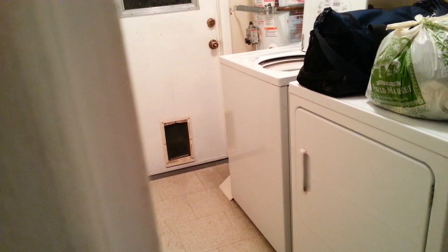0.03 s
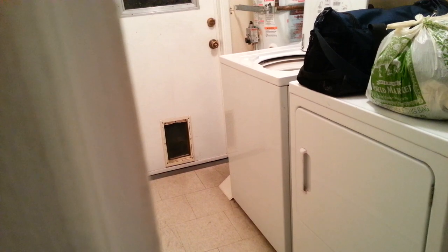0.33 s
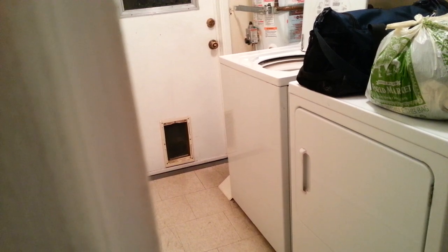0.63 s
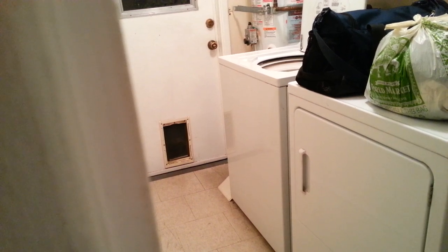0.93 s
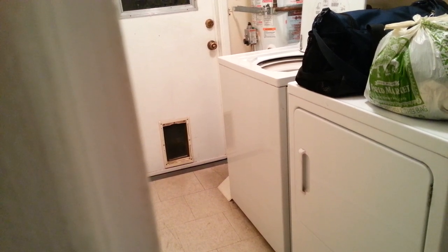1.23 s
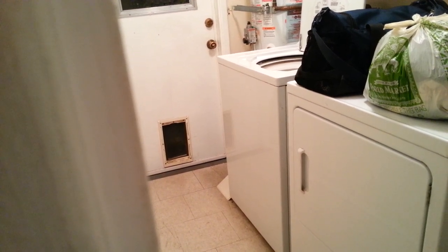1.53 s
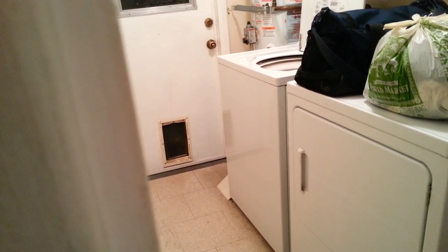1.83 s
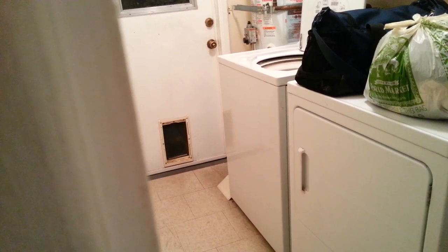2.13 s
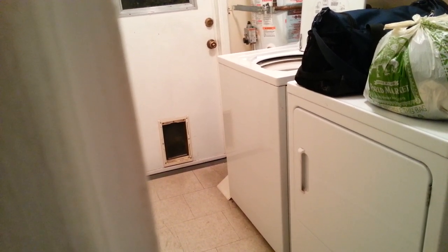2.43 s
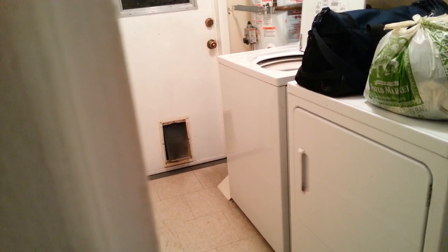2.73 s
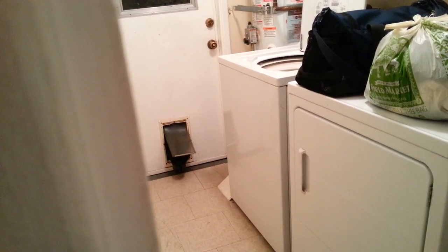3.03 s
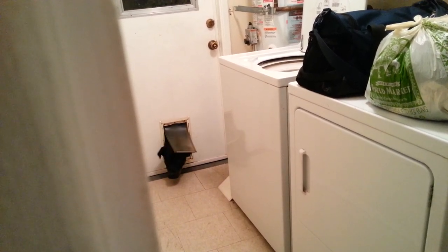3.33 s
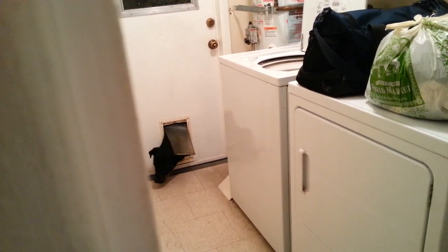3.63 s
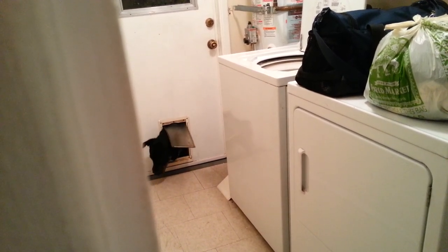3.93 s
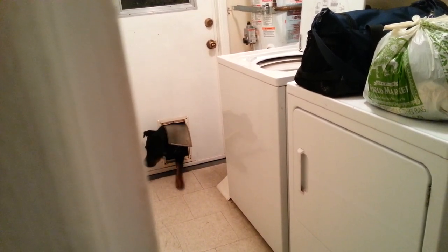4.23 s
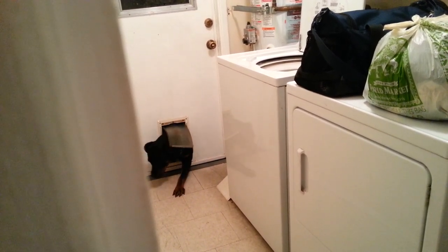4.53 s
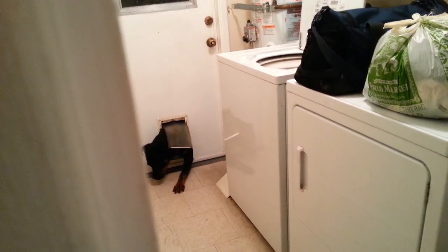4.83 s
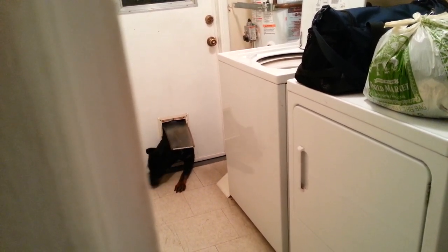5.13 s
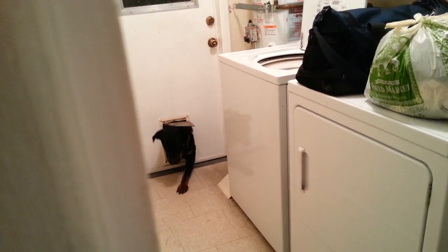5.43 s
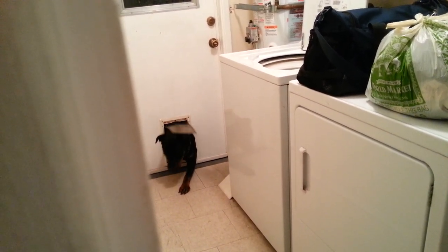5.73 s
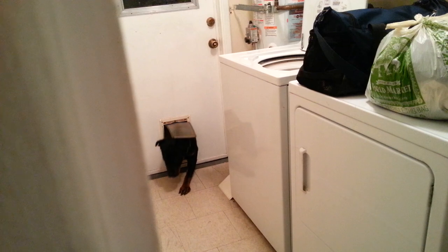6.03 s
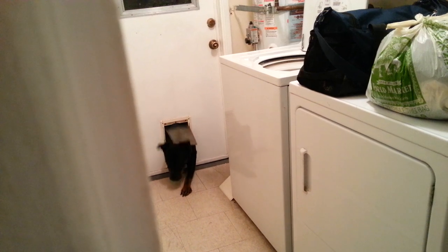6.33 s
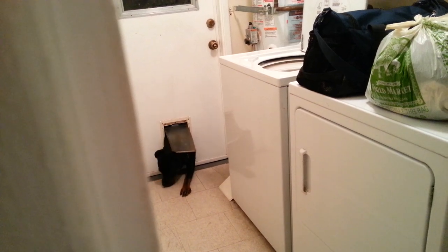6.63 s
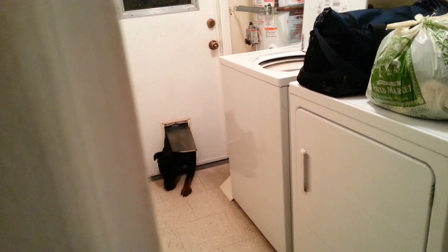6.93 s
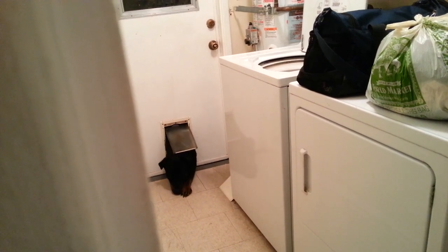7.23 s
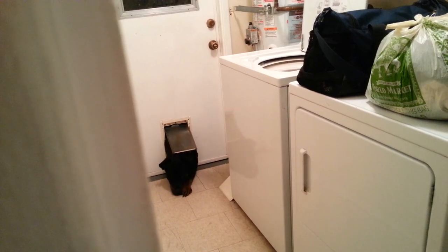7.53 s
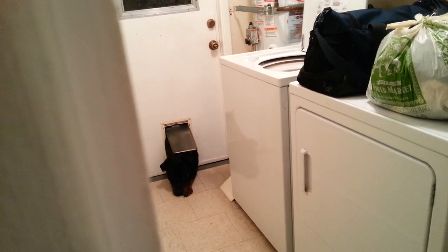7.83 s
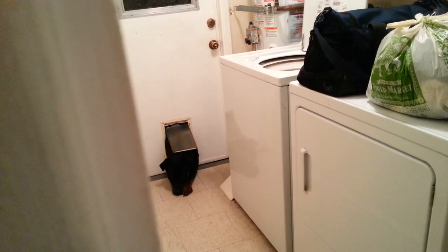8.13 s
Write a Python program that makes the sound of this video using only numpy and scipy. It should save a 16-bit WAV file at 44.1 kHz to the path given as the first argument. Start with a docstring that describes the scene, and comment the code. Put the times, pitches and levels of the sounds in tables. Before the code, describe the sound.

A plastic pet door flap clacks, scrapes and thumps as a dog squeezes through, collar tags jingling faintly in a quiet, humming room.

```python
"""A plastic pet-door flap clacks and scrapes as a dog squeezes through, a few metres away in a laundry room.
Impacts excite the modes of flap and frame; friction makes the fur hiss and the flap edge squeak.
The dog's shoulders bend the door panel into thumps and set the loose frame rattling, and its metal
collar tags collide and jingle. The hard walls reverberate, over a low steady hum."""
import sys
import numpy as np
from scipy import signal
from scipy.fft import rfft, irfft, next_fast_len
from scipy.io import wavfile

SR = 44100
rng = np.random.default_rng(int(sys.argv[2]) if len(sys.argv) > 2 else 0)


def store_pcm(level_fs):
    """Save levels as 16-bit WAV."""
    pcm = np.round(np.clip(level_fs, -1, 1) * 32767).astype(np.int16)
    wavfile.write(sys.argv[1], SR, np.atleast_2d(pcm).T)


N = 369116
EVENT_SIZE = 16384
EVENT_S = np.arange(EVENT_SIZE) / SR  # time axis of a single event

# shoves against the door: start_s, thump_db, swing_hz, rattle_db
SHOVES = [(3.318, -26, 320, -29), (3.885, -33, 230, -49), (4.286, -28, 222, -25.5), (4.313, -26, 202, -49),
          (4.743, -12.5, 299, -17), (4.882, -23.5, 242, -19.5), (5.355, -22, 223, -22),
          (5.439, -29, 300, -60), (5.550, -39, 232, -32), (5.697, -28, 222, -25.5),
          (6.062, -21, 242, -22.5), (6.235, -35, 227, -34), (6.564, -27.5, 237, -27.5)]


def undb(db):
    """Amplitude ratio of a level in decibels."""
    return 10 ** (np.asarray(db) / 20)


def unit(x):
    """Normalisation to unit energy."""
    return x / np.sqrt(np.sum(x ** 2) + 1e-18)


def read_curve(points, hz):
    """Interpolation of (frequency_hz, value) points on a logarithmic frequency axis."""
    point_hz, value = np.transpose(points)
    return np.interp(np.log(hz + 1), np.log(point_hz), value)


def colour(points, tilt_db=0, bump_hz=1000, bump_db=0, size=2048):
    """Minimum-phase response from (frequency_hz, level_db) points, a tilt per octave and a resonance."""
    hz = np.fft.rfftfreq(size, 1 / SR)
    db = read_curve(points, hz) + tilt_db * np.log2(np.maximum(hz, 400) / 1500)
    db += bump_db * np.exp(-(2 * np.log2((hz + 1) / bump_hz)) ** 2)
    cepstrum = irfft(np.log(undb(db)))
    cepstrum[1:size // 2] *= 2  # folding the cepstrum makes the response causal
    cepstrum[size // 2 + 1:] = 0
    return irfft(np.exp(rfft(cepstrum)))


def through(x, response):
    """Convolution with an impulse response, cut to the length of the input."""
    return signal.oaconvolve(x, response)[:len(x)]


def add(track, start_s, sound):
    """Superposition of a sound on a track."""
    i = int(np.clip(start_s * SR, 0, N - 1))
    track[i:i + len(sound)] += sound[:N - i]


def ring(hz, t60_s):
    """Free vibration of one damped mode."""
    return np.sin(2 * np.pi * hz * EVENT_S) * np.exp(-np.log(1000) * EVENT_S / t60_s)


def arch(length_s):
    """Half-sine pulse, followed by silence."""
    return np.sin(np.pi * np.minimum(EVENT_S / length_s, 1))


def clicks(size, per_s, spread_db):
    """Poisson process of tiny contacts of uneven strength, at unit rms."""
    hits = rng.random(size) < per_s / SR
    strength = undb(spread_db * np.clip(rng.standard_normal(size), -2, 2))
    return unit(hits * rng.choice([-1, 1], size) * strength) * np.sqrt(size)


def flap_clacks(chatter_s=0.003, chatter_db=7, resonance_db=5, gain_db=24):
    """Impact excitation: each hard contact chatters and favours the resonance of the spot it strikes."""
    # flap clacks and claw taps: start_s, level_db, tilt_db_per_octave, resonance_hz
    impacts = [(2.984, -44.5, -13.5, 1300), (3.088, -27, -10, 990), (3.152, -16.5, 1, 1800),
               (3.163, -6.5, 0.1, 3050), (3.167, -16, -2, 1800), (3.172, -10, -1.5, 1130),
               (3.363, -20.5, 0.5, 1210), (3.397, -19.5, 1.5, 3400), (3.705, -21, 3, 2600),
               (3.825, -25.5, 5, 2800), (4.102, -19, -4, 1360), (4.14, -19, 6, 3780),
               (4.17, -19.5, 3.5, 2650), (4.282, -21.5, 5.5, 2560), (4.531, -24.5, 4, 4330),
               (4.593, -24.5, 7.5, 2450), (5.007, -32.5, 12.5, 3420), (5.446, -30, 7, 1200),
               (5.563, -31.5, -0.5, 1140), (5.868, -30, 3, 2700), (5.887, -25, 4.5, 2750),
               (6.561, -33, -8.5, 800), (6.582, -38, -3.5, 3200), (7.294, -27.5, 5, 3000)]
    # spectrum of a hard contact: frequency_hz, level_db
    crack = [(60, -34), (200, -6), (500, -4.5), (700, -1.5), (950, 1), (1600, 3), (2200, 0.5), (3200, -2),
             (5000, -8), (7000, -14.5), (10000, -22), (14500, -45)]
    out = np.zeros(N)
    decay = np.exp(-EVENT_S[:4096] / chatter_s)
    for start_s, level_db, tilt_db, resonance_hz in impacts:
        contact = undb(chatter_db) * unit(clicks(len(decay), per_s=3700, spread_db=1.5) * decay)
        contact[0] += 1  # the first strike
        spot = colour(crack, tilt_db, resonance_hz, resonance_db)
        add(out, start_s, undb(level_db + gain_db) * unit(through(contact, spot)))
    return out


def plastic_body(force, direct_db, ring_db):
    """Modal resonance: flap and frame radiate each contact into the room and ring on after it."""
    # modes of the flap and frame: pitch_hz, bandwidth_hz, level_db
    modes = [(754, 19, -3), (947, 23, 0), (1130, 55, 0), (1450, 28, -5), (1790, 28, -3), (2280, 27, -10),
             (2600, 38, -8), (3090, 33, -7), (3420, 22, -8)]
    ringing = np.zeros((2, N))
    for channel in range(2):
        response = 0
        for pitch_hz, bandwidth_hz, level_db in modes:
            t60_s = np.log(1000) / (np.pi * bandwidth_hz)
            response += rng.choice([-1, 1]) * undb(level_db) * ring(pitch_hz, t60_s)
        ringing[channel] = through(force, unit(response))
    return room(force, direct_db) + undb(ring_db) * ringing


def flap_squeaks(t60_s=0.0071, gain_db=23):
    """Stick-slip friction: the catching edge drives one resonance of the flap."""
    # catches of the flap edge: start_s, length_s, pitch_hz, level_db
    catches = [(3.084, 0.034, 850, -28), (3.319, 0.029, 268, -25.5), (3.324, 0.043, 475, -27),
               (3.382, 0.072, 830, -31.5), (3.538, 0.097, 840, -37), (4.179, 0.029, 1010, -18.5),
               (4.237, 0.052, 1070, -22), (5.423, 0.022, 690, -29)]
    out = np.zeros(N)
    for start_s, length_s, pitch_hz, level_db in catches:
        slips = clicks(EVENT_SIZE, per_s=810, spread_db=5.5) * arch(length_s)
        mode = np.diff(ring(pitch_hz, t60_s)[:2048])  # differencing makes the resonance a band-pass, so the squeak carries little bass
        squeak = through(through(slips, mode), mode)
        add(out, start_s, undb(level_db + gain_db) * unit(squeak))
    return out


def door_thumps(swing_db=3, swing_t60_s=0.028, push_cycles=0.71, echo_s=0.028, echo_db=-10, gain_db=23):
    """Plate bending: a soft push excites one heavily damped swing and the modes of the door panel."""
    # modes of the door panel: pitch_hz, t60_s, level_db
    modes = [(60, 0.24, -8.5), (80, 0.22, -29), (154, 0.17, -20), (185, 0.16, 0), (227, 0.12, 2.5),
             (288, 0.11, -0.5), (355.2, 0.17, 0), (465, 0.089, -7.5), (610, 0.068, 2)]
    ringing = unit(sum(undb(db) * ring(hz, t60_s) for hz, t60_s, db in modes))
    out = np.zeros(N)
    for start_s, thump_db, swing_hz, _ in SHOVES:
        panel = ringing + undb(swing_db) * unit(ring(swing_hz, swing_t60_s))
        push = arch(push_cycles / swing_hz)[:512] ** 2
        radiated = through(panel, np.diff(push))  # only a changing force radiates
        thump = undb(thump_db + gain_db) * unit(radiated)
        add(out, start_s, thump)
        add(out, start_s + echo_s, undb(echo_db) * thump)  # reflection from the far wall
    return out


def frame_rattles(lag_s=0.012, peak_s=0.009, gain_db=24):
    """Contact chatter: just after each shove the loose frame catches up and buzzes briefly."""
    # spectrum of the buzzing frame: frequency_hz, level_db
    spectrum = [(60, -26), (200, -7), (500, -3), (1100, -1.5), (1900, -7), (3500, -6.5), (5000, -11.5),
                (7000, -21.5), (10000, -32), (14500, -54)]
    out, buzz = np.zeros(N), colour(spectrum)
    swell = (EVENT_S / peak_s) ** 2 * np.exp(-2 * EVENT_S / peak_s)
    for start_s, _, _, rattle_db in SHOVES:
        contacts = swell * clicks(EVENT_SIZE, per_s=1500, spread_db=1)
        add(out, start_s + lag_s, undb(rattle_db + gain_db) * unit(through(contacts, buzz)))
    return out


def fur_rubbing(tick_db=-1, hiss_db=-5, surge_peak_s=0.038, surge_db=-17, gain_db=-4):
    """Sliding friction: fur hisses on the frame and the flap edge ticks over it, surging at each shove."""
    # steady rubbing, set by how tightly the dog fills the frame: time_s, level_db
    squeeze = [(2.65, -66), (3.3, -45), (3.95, -49.5), (4.4, -40), (5.15, -49), (5.8, -42.5), (6.55, -47),
               (6.85, -60)]
    # spectrum of sliding fur: frequency_hz, level_db
    spectrum = [(100, -13), (250, 2.5), (500, -2), (1000, -5), (1900, -10), (3300, -9.5), (6000, -19),
                (9000, -21.5), (14500, -31)]
    pressure = undb(np.interp(np.arange(N) / SR, *np.transpose(squeeze), left=-120, right=-120))
    surge = (EVENT_S / surge_peak_s * np.exp(1 - EVENT_S / surge_peak_s)) ** 2
    for start_s, _, _, rattle_db in SHOVES:
        add(pressure, start_s, undb(rattle_db + surge_db) * surge)
    ticks = undb(tick_db) * clicks(N, per_s=490, spread_db=1)
    hiss = undb(hiss_db) * rng.standard_normal(N)
    return undb(gain_db) * through((ticks + hiss) * pressure, unit(colour(spectrum)))


def scuffs(gain_db=23):
    """Friction noise: paws, coat and flap brush the door in soft, muffled strokes."""
    # brushes against the door: start_s, length_s, level_db, tilt_db_per_octave
    strokes = [(1.194, 0.073, -40, -0.5), (2.7, 0.061, -41, -0.5), (2.734, 0.24, -39.5, 10.5),
               (3.017, 0.2, -30.5, 5.5), (3.198, 0.21, -25.5, 2), (3.67, 0.31, -30.5, 3),
               (4.099, 0.28, -19.5, 3), (4.359, 0.12, -35.5, 6.5), (4.547, 0.094, -29, 0.5),
               (5.229, 0.15, -34.5, 4), (5.393, 0.095, -28.5, 1), (5.862, 0.095, -24.5, 1.5),
               (6.352, 0.056, -30.5, 3), (7.293, 0.033, -31.5, 2), (7.437, 0.29, -35.5, 3),
               (7.681, 0.39, -40.5, 2)]
    # spectrum of a soft contact: frequency_hz, level_db
    muffled = [(60, -35), (150, -15), (350, 1.5), (700, 0), (1200, -4), (2200, -9), (8000, -24),
               (14500, -42)]
    out = np.zeros(N)
    for start_s, length_s, level_db, tilt_db in strokes:
        slide = rng.standard_normal(EVENT_SIZE) * arch(length_s)
        add(out, start_s, undb(level_db + gain_db) * unit(through(slide, colour(muffled, tilt_db))))
    return out


def collar_tags(touches=4, bounce_s=0.014, bounce_db=-6, tick_db=-17, upper_hz=12000, gain_db=21):
    """Free vibration of plates: two metal tags rebound, and each touch weights their modes anew."""
    # collisions: start_s, level_db, first_over_second_db, upper_modes_db
    collisions = [(3.191, -29, 3, -4), (3.398, -30, -2, 11), (3.824, -35.5, 4, 6), (3.855, -25.5, 13, -8),
                  (4.185, -23, 14, 13), (5.599, -50, -19, -8), (5.826, -38.5, -4, -4),
                  (5.997, -33.5, -1, -7), (6.128, -37.5, -7, -3), (6.242, -32, 1, -7),
                  (6.584, -26, -7.5, -4)]
    # modes of the tags: pitch_hz, owner (+1 first tag, -1 second)
    tag_modes = [(9286, -1), (9787, 1), (10588, -1), (10975, 1), (12790, -1), (12825, 1)]
    # ring of each of those modes: t60_s, level_db
    decays = [(.15, -20), (.15, -17), (.28, -6.5), (.48, -3), (.15, -2), (.2, -9)]
    pitches_hz, owner = np.transpose(tag_modes)
    modes = np.array([undb(db) * ring(hz, t60_s) for hz, (t60_s, db) in zip(pitches_hz, decays)])
    tick = unit(colour([(1000, -21), (4000, 6), (9000, -6), (14500, 5)]))
    out = np.zeros(N)
    for start_s, level_db, first_over_second_db, upper_modes_db in collisions:
        # the upper modes depend on where the tags touch
        weights_db = owner * first_over_second_db / 2 + upper_modes_db * (pitches_hz > upper_hz)
        jingle, delay_s = np.zeros(2 * EVENT_SIZE), 0
        for bounce in range(touches):
            touch = unit(undb(weights_db + 2 * rng.standard_normal(len(modes))) @ modes)
            touch[:len(tick)] += undb(tick_db) * tick
            add(jingle, delay_s, undb(bounce * bounce_db) * touch)
            delay_s += bounce_s * (0.5 + rng.random())
        add(out, start_s, undb(level_db + gain_db) * unit(jingle))
    return out


def collar_chinks(fade_s=0.011, gain_db=23):
    """Damped impacts: small metal parts chatter in a quick run of bright ticks without ringing."""
    # runs of ticks: start_s, level_db
    runs = [(3.4, -47), (4.185, -32), (4.3, -34), (4.532, -37), (4.599, -32), (4.905, -39), (5.005, -51),
            (5.445, -39), (6.0, -34.5), (6.39, -41), (6.585, -49), (7.294, -41)]
    bright = colour([(2000, -16), (7000, 1), (10000, -1), (13500, 3), (14500, -10)])
    decay = np.exp(-EVENT_S[:8192] / fade_s)
    out = np.zeros(N)
    for start_s, level_db in runs:
        ticks = clicks(len(decay), per_s=880, spread_db=-4) * decay
        add(out, start_s, undb(level_db + gain_db) * unit(through(ticks, bright)))
    return out


def diffuse_noise(size, unrelated_hz):
    """Diffuse-field coherence: two close microphones get alike noise in the bass, unrelated in the treble."""
    first, second = rfft(rng.standard_normal((2, size)))
    hz = np.fft.rfftfreq(size, 1 / SR)
    side_ratio = np.clip((hz / unrelated_hz) ** 2, 0.03, 1)
    mid = first / np.sqrt(1 + side_ratio)
    side = second * np.sqrt(side_ratio / (1 + side_ratio))
    return irfft(np.array([mid + side, mid - side]))


def room(x, direct_db, build_s=0.002, size=24576):
    """Reverberation: hard walls give each source its own reflections, decaying band by band."""
    # reverberation times: frequency_hz, t60_s
    decays = [(100, 0.77), (300, 0.48), (1000, 0.3), (3000, 0.38), (7000, 0.33), (14000, 0.24)]
    centres_hz, t60s = np.transpose(decays)
    t, hz = np.arange(size) / SR, np.fft.rfftfreq(size, 1 / SR)
    diffuse = rfft(diffuse_noise(size, unrelated_hz=1300))
    responses = np.zeros((2, size))
    for share, t60_s in zip(np.eye(len(decays)), t60s):
        band = read_curve(np.c_[centres_hz, share], hz)
        envelope = np.exp(-np.log(1000) * t / t60_s) * (1 - np.exp(-t / build_s))
        responses += irfft(diffuse * band) * unit(envelope)
    responses[:, 0] += undb(direct_db)
    return np.array([through(x, response) for response in responses])


def hum(motor_gain_db=-2, boom_gain_db=-1, boom_t60_s=0.44):
    """Narrow-band noise: a motor hums and two low room resonances boom."""
    # the motor, then the room resonances: pitch_hz, level_db
    tones = [(118.4, -60), (199.2, -63), (312.2, -58.5)]
    (motor_hz, motor_db), *resonances = tones
    motor_band = np.hanning(EVENT_SIZE) * np.sin(2 * np.pi * motor_hz * EVENT_S)
    motor = unit(through(rng.standard_normal(N), motor_band)) * np.sqrt(N)
    boom = sum(undb(db) * through(rng.standard_normal(N), unit(ring(hz, boom_t60_s)))
               for hz, db in resonances)
    return undb(motor_db + motor_gain_db) * motor + undb(boom_gain_db) * boom


def air(level_db=-48.5):
    """Stationary noise: a soft diffuse field, strongest in the bass, fills the room."""
    # spectrum of the air noise: frequency_hz, level_db
    spectrum = [(15, -65), (25, -55), (47, -17.5), (81, -30.5), (108, -4.5), (166, -13.5), (199, -0.5),
                (228, -8.5), (275, -16.5), (314, -9), (443, -14.5), (985, -23), (1070, -24), (3630, -35.5),
                (14500, -38.5)]
    # its stereo balance: frequency_hz, left_minus_right_db
    imbalance = [(60, -1.0), (110, -1.6), (200, -1.0), (380, -1.5), (690, -3), (1280, -1.6), (2350, 0.5),
                 (4330, 1.5), (7990, -0.94), (14700, -3.5)]
    size = next_fast_len(N + N % 2, real=True) // 2 * 2
    hz = np.fft.rfftfreq(size, 1 / SR)
    shape = undb(read_curve(spectrum, hz))
    shape /= np.sqrt(np.mean(shape ** 2))
    balance = undb(np.outer([0.5, -0.5], read_curve(imbalance, hz)))
    noise = rfft(diffuse_noise(size, unrelated_hz=970))
    return undb(level_db) * irfft(noise * balance * shape)[:, :N]


def scene(right_lag_samples=6):
    """Superposition in one room; the right microphone faces away, so its sound is shadowed and late."""
    # acoustic shadow at the right microphone: frequency_hz, left_minus_right_db
    shadow = [(300, -0.5), (700, -1), (1200, -2.5), (1700, 3.5), (2400, 10), (4300, 21), (8000, 23.5),
              (11000, 17), (14500, 14)]
    flap = plastic_body(flap_clacks(), direct_db=-7, ring_db=-12.5)
    frame = plastic_body(frame_rattles(), direct_db=-5.5, ring_db=-30)
    coat = plastic_body(fur_rubbing() + scuffs(), direct_db=-0.5, ring_db=-17.5)
    collar = room(collar_tags(), direct_db=4) + room(collar_chinks(), direct_db=-4.5)
    door = room(door_thumps(), direct_db=-2)
    squeaks = room(flap_squeaks(), direct_db=-2.5)
    left, right = flap + frame + coat + collar + door + squeaks
    shadowed = through(right, colour([(hz, -db) for hz, db in shadow]))
    left, right = np.array([left, shadowed]) + air() + hum()
    return np.array([left, np.roll(right, right_lag_samples)])


def record(dry, low_hz=46, top_hz=14600):
    """Clipping and band limiting: peaks stop at full scale, then the deepest bass and the top are cut."""
    highpass = signal.butter(6, low_hz, "high", fs=SR, output="sos")
    lowpass = signal.ellip(10, 0.2, 70, top_hz, fs=SR, output="sos")
    return signal.sosfilt(lowpass, signal.sosfilt(highpass, np.clip(dry, -1, 1)))


dry = scene()
out = record(dry)
store_pcm(out)
```